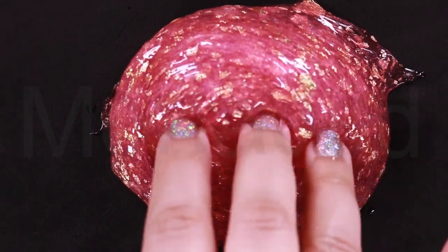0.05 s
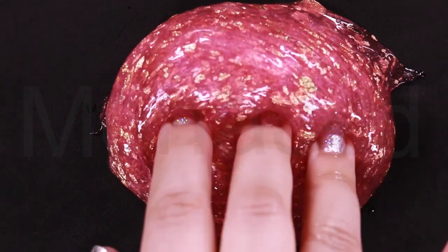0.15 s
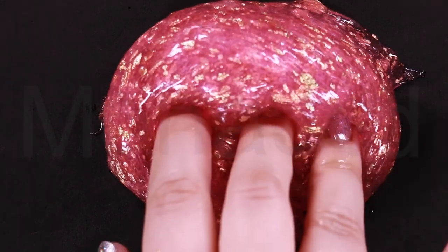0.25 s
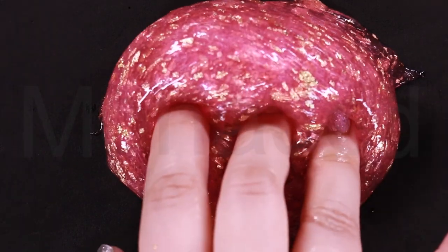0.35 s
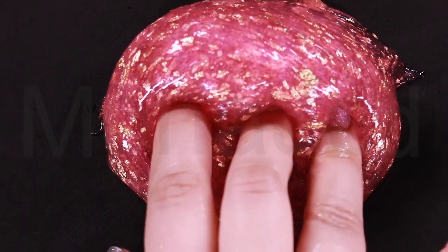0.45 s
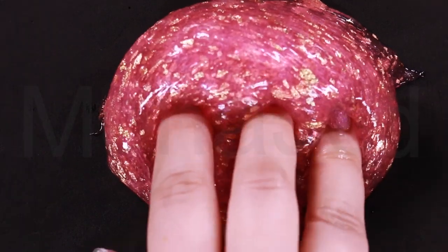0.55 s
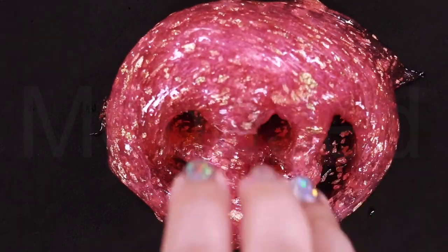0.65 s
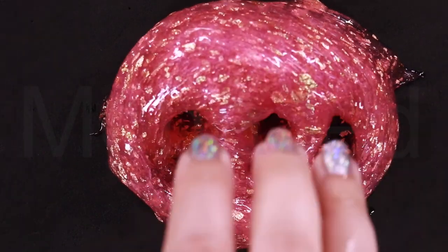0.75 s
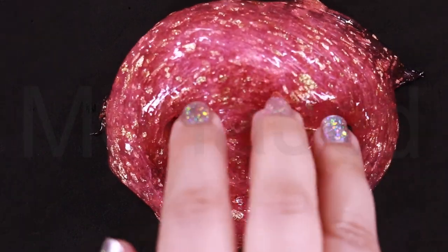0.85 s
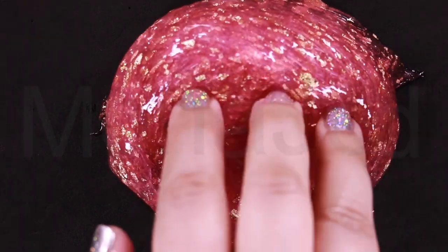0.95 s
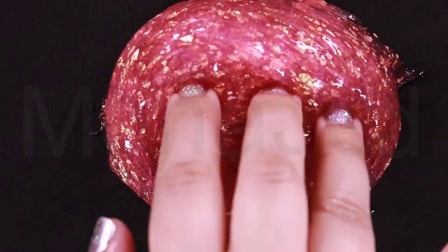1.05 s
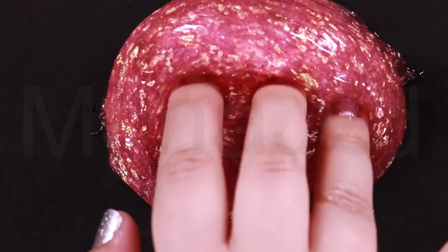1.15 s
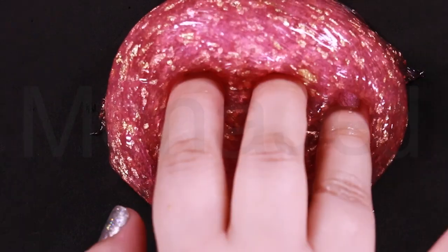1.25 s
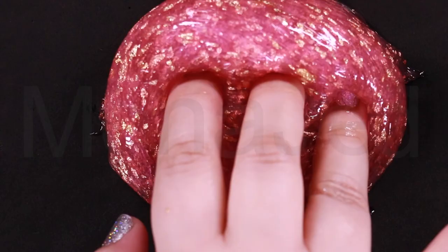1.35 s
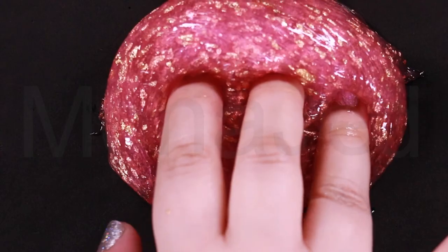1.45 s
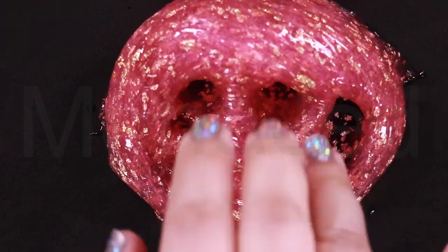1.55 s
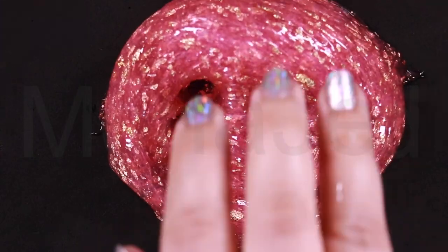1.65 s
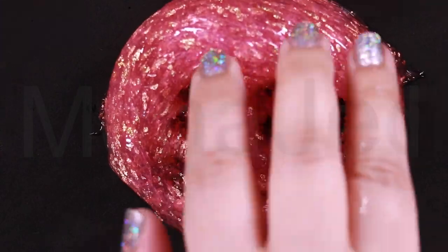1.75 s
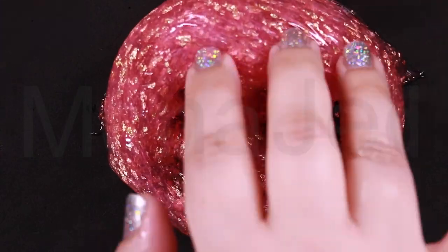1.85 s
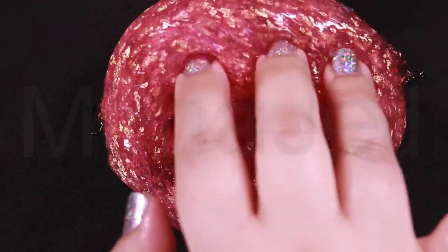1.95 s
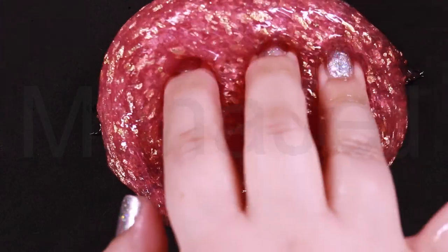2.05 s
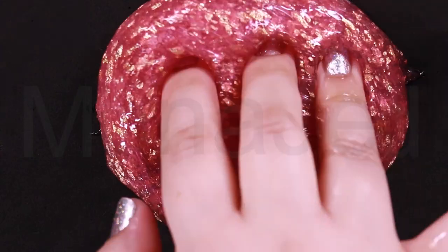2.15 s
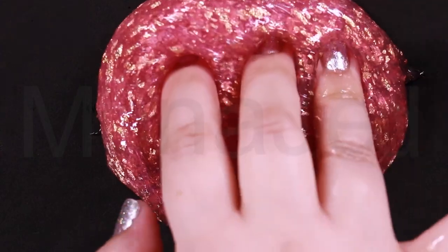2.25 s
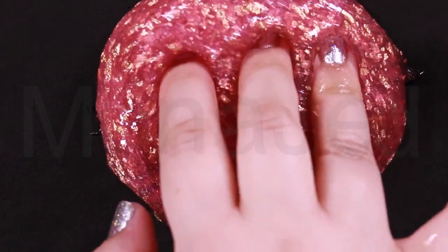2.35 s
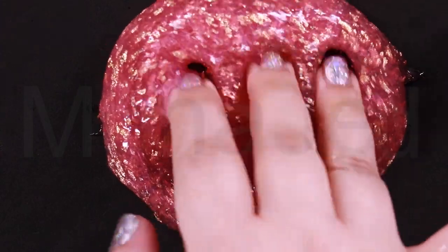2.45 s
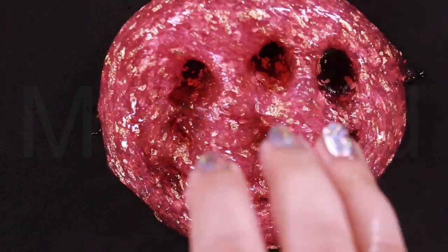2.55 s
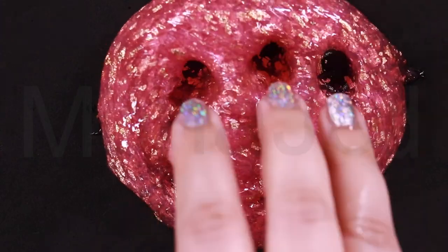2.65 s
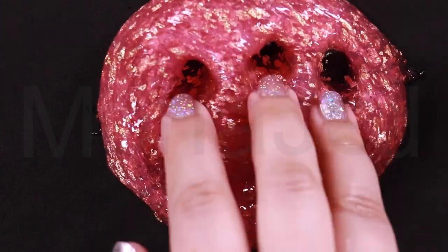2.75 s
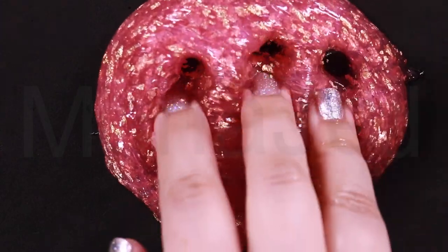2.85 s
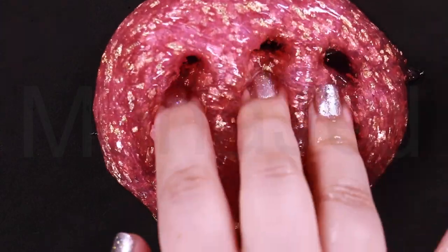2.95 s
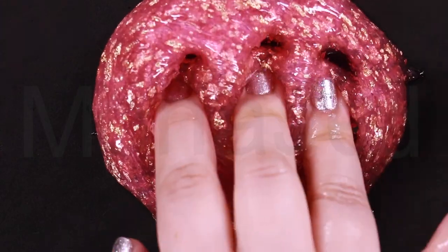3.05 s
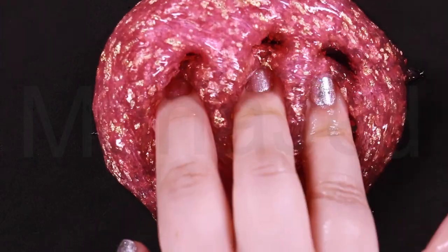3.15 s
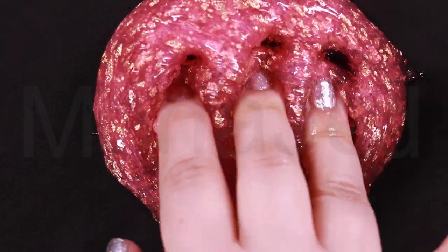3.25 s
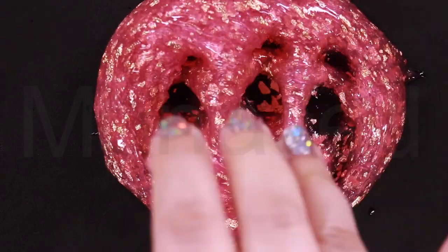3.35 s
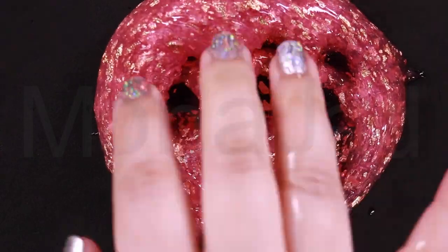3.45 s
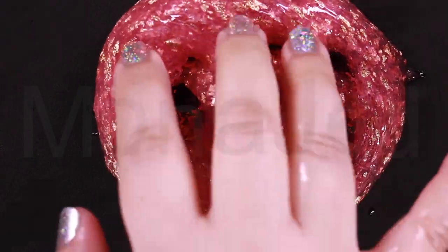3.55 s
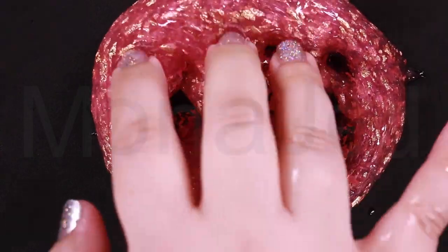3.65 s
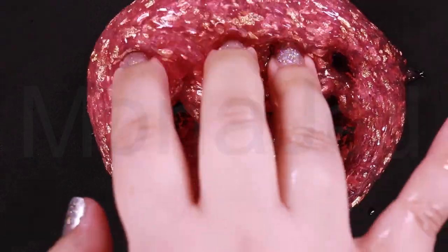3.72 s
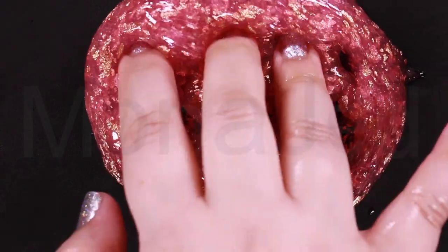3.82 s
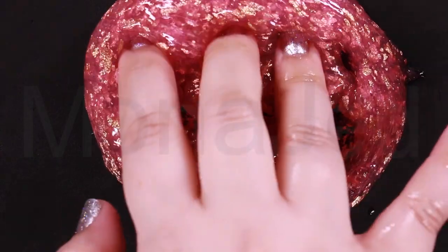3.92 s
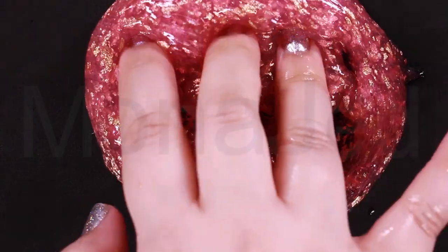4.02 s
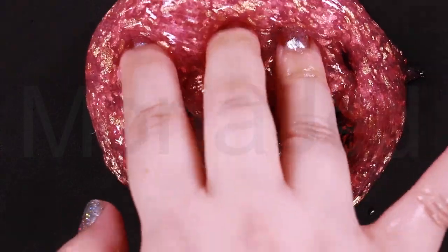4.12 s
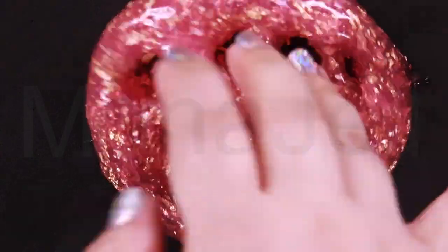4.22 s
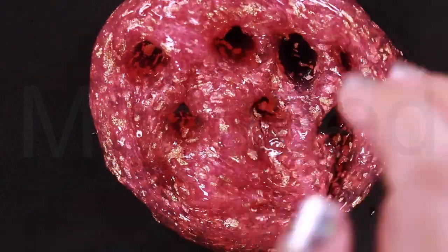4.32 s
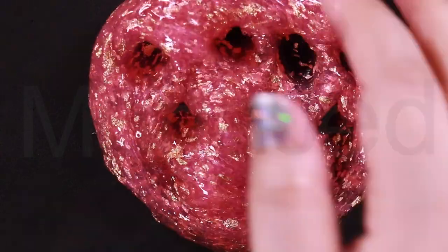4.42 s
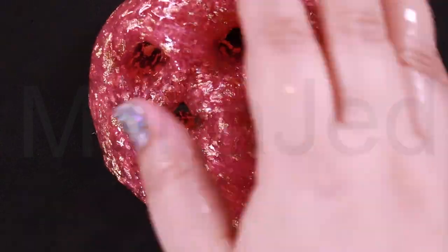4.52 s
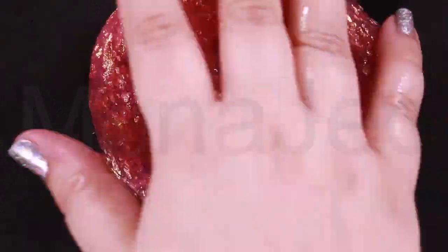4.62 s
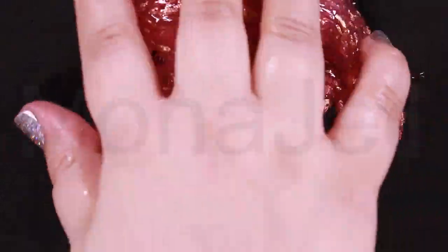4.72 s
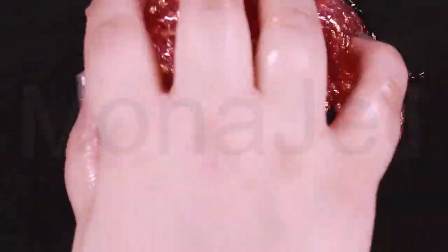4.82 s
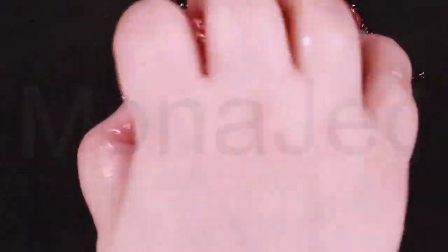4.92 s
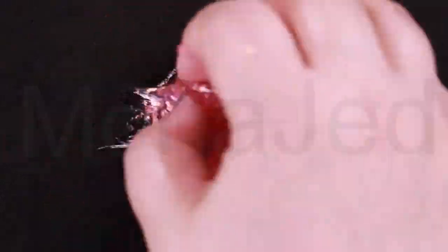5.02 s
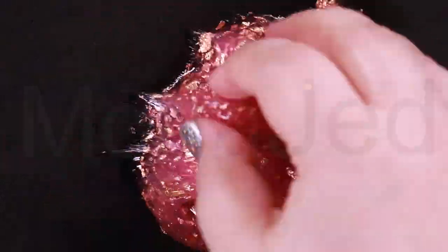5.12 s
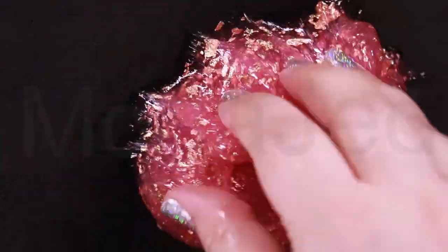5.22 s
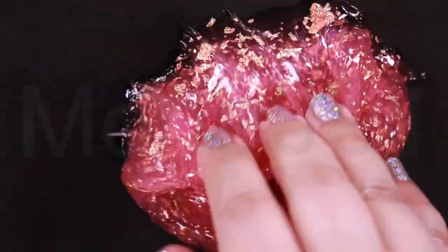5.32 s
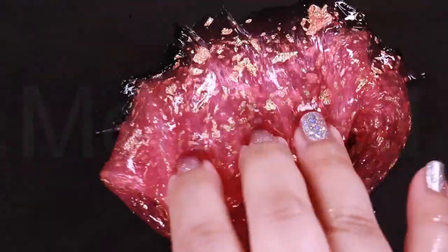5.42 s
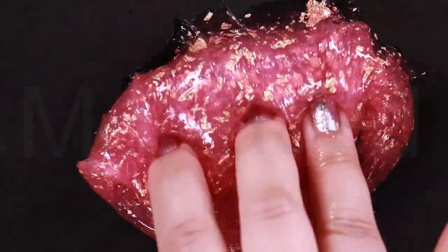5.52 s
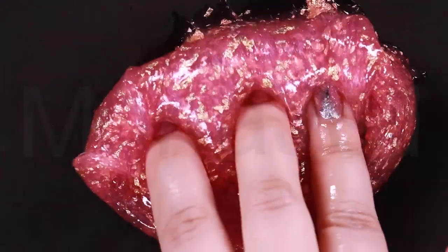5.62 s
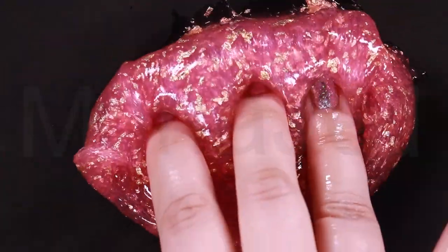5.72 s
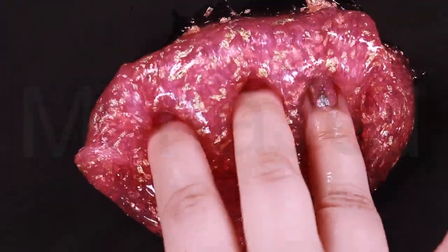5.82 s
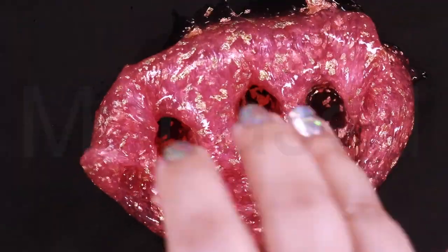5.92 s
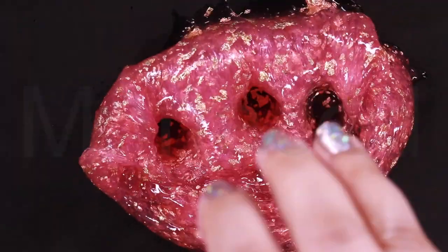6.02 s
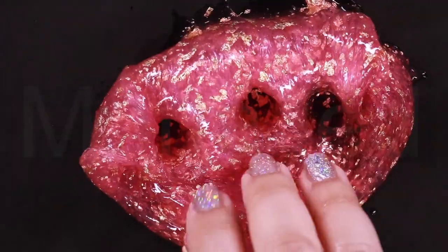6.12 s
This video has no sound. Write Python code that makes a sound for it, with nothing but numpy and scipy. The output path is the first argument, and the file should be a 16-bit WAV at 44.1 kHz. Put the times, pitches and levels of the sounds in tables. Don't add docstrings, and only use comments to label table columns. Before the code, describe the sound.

Close, dry-detailed slime handling in a small reverberant room. Bursts of sticky snapping and round, hollow pops break long quiet gaps, the loudest slightly overloaded. The first three bursts are strong; a thin wet squeak follows, then weaker pops and one hard smack. Squeezed air pockets squelch and fizz quietly with small hisses, before a final double pop. Soft table thuds ring beneath, with a very faint fan and far machine drone.

```python
import sys
import numpy as np
from scipy import signal
from scipy.fft import rfft, irfft, next_fast_len
from scipy.io import wavfile
from scipy.ndimage import uniform_filter1d, map_coordinates

SR = 44100
rng = np.random.default_rng(int(sys.argv[2]) if len(sys.argv) > 2 else 0)


def store_pcm(level_fs):
    pcm = np.round(np.clip(level_fs, -1, 1) * 32767).astype(np.int16)
    wavfile.write(sys.argv[1], SR, np.atleast_2d(pcm).T)


def magnitude_from_level(level_db):
    exponent = np.asarray(level_db, float) / 20
    return 10 ** exponent


N = 272097

# t/s, level/dB, brightness/dB, patch f/Hz, length/ms
RIPS = [(0.2843, -32, 8, 5970, 3.3), (0.668, -7.5, 11, 5400, 3), (0.6708, -10.5, -11, 4700, 3.5),
        (0.6851, -5.5, -6.5, 4210, 5), (1.5846, -14, 7.5, 6400, 2), (1.5868, -9.5, 4.5, 5000, 3),
        (1.5922, -7, -11.5, 4870, 2.5), (1.6002, -10.5, -3.5, 4850, 2), (1.6023, -6, -11, 3056, 3),
        (2.5045, -21.5, 5, 3000, 0.91), (2.541, -18.5, 7, 6000, 3), (2.5452, -10, -2, 3200, 3),
        (2.5488, -15.5, -8, 3936, 3.5), (3.358, -28.5, -1.5, 6000, 3), (3.3613, -24, -7.5, 3000, 4.5),
        (3.372, -31, 0, 5000, 6), (4.2752, -29, -1.5, 3200, 4), (4.294, -24, -11.5, 5000, 3),
        (4.301, -29, -10, 3484, 9), (4.3715, -5.5, -39.5, 2250, 2), (5.9381, -22.5, -5.5, 4010, 3.5),
        (5.9469, -15, -16, 4260, 1.5), (5.9495, -15.5, 4, 5530, 4.5)]
SNAP_T60_MS, SNAP_LOSS_DB, DULLING_DB, PATCH_SCATTER, PATCH_SINKS = 8, 2, 9, 0.05, 0.87
# t/s, level/dB, brightness/dB, patch f/Hz
TICKS = [(0.662, -28.5, -10, 4500), (0.695, -20.5, -17, 4800), (1.307, -66.5, 16.5, 2200),
         (1.45, -55, 18.5, 2180), (1.471, -60.5, 13, 2200), (1.5605, -33.5, -6, 1944),
         (1.5829, -11.5, 7.5, 5000), (2.5302, -17, 0, 4300), (2.5379, -28, 12, 5100),
         (3.183, -52, -12.5, 5000), (3.198, -39, -12, 4500), (3.2322, -38, -18, 5600),
         (3.2764, -29, -14, 4670), (3.3448, -21.5, -19.5, 4230), (3.3513, -37, 1, 5000),
         (3.381, -17.5, -16, 3950), (4.354, -36, -20, 1900), (4.3649, -29, -27, 1890),
         (4.783, -49.5, -18.5, 5600), (4.815, -32.5, -18, 2170), (4.8587, -37.5, -10, 5000),
         (4.993, -26.5, 7, 5900), (5.256, -45, -16, 4280), (5.224, -52, -19, 3300),
         (5.439, -47.5, -3, 2920), (5.501, -35, -15, 3090), (5.679, -54.5, 8, 1900),
         (5.9217, -32, 14.5, 6570)]
TICK_T60_MS, LINGER = 6.1, 1.2
# f/Hz, width/Hz, level/dB
FILM = [(1300, 530, -4.5), (3000, 760, -2), (5000, 2300, -12)]
FINE_FILM = [(8640, 4200, 0), (12400, 2400, 0.5)]

# t/s, level/dB, cavity f/Hz, t60/ms, wait for the gulp/ms
HOLES = [(0.6693, -11, 870, 14, 7.7), (0.6881, 1.5, 904, 19, 14.2), (1.589, -2, 1443, 6.3, 3.5),
         (1.603, -2, 864, 15, 10.6), (1.594, -5.5, 950, 12, 4), (2.5463, -2, 1074, 10.2, 5),
         (2.5515, -8.5, 1006, 33, 17), (3.3615, -13, 842, 14.4, 6.1), (4.2755, -17.5, 1175, 20, 6.9),
         (4.2929, -12.5, 1007, 18.4, 5.7), (4.3685, -14, 1502, 10, 2), (4.3712, -5, 1686, 6.7, 1.5),
         (4.3735, -9.5, 808, 18, 4.36), (5.9378, -12.5, 890, 21, 3.5), (5.9498, -4, 847, 27, 5.86)]
GULP_LOSS_DB, GULP_LATE_DB_PER_MS, GULP_PITCH = 2, 0.78, 0.87
# t/s, level/dB, cavity f/Hz
BLIPS = [(0.286, -41, 1390), (0.6622, -28.5, 682), (1.56, -37, 1300), (2.51, -35.5, 1492),
         (2.53, -24, 1075), (2.543, -23, 1402), (3.183, -40, 1110), (3.2, -37.5, 1316), (3.233, -36, 1104),
         (3.275, -33, 1096), (3.346, -28.5, 1610), (3.357, -31, 1160), (4.3075, -25, 1057),
         (4.3429, -25.5, 870), (4.3526, -39, 970), (4.816, -41, 1060), (4.9923, -28.5, 1257),
         (5.9468, -10.5, 930), (5.932, -31.5, 890), (5.984, -26, 950), (0.672, -9, 1375)]
BLIP_T60_MS = 22

# t/s, flap f/Hz, level/dB, roughness/1
SQUEAK = [
    (2.891, 448.6, -56, 0.13),
    (2.897, 438.2, -33, 0.41),
    (2.912, 481.7, -31, 0.36),
    (2.926, 555.3, -31.5, 0.29),
    (2.959, 554.7, -30.5, .25),
    (2.975, 451.5, -32, 0.5),
    (3.03, 443.7, -32, 0.5),
    (3.09, 430, -43, .9),
    (3.17, 433, -55, .9),
]
GASP_S, GASP_DB, GASP_RISE_S, GASP_FADE_DB_PER_S = 3.274, -32, 0.0069, 239
# f/Hz, width/Hz, level/dB
SLIT = [(524, 400, -5), (1120, 400, 2), (1600, 290, 0), (2250, 78, -1), (3170, 320, -0.5), (5100, 460, 3.5),
        (3950, 300, -5.5), (6000, 1100, -13.5)]

# t/s of the peak, bubbling level/dB, 10 dB fall/ms, fizz above it/dB, pocket f/Hz
SQUEEZES = [(4.84, -52.5, 55, -4.5, 1267), (4.933, -36.5, 28, -9.5, 1300), (4.954, -43.5, 11, -0.5, 1260),
            (5.075, -38, 32, -19, 1115), (5.129, -30, 31.5, -14.5, 977), (5.159, -37, 22.5, -5, 1025),
            (5.255, -45, 33, -13.5, 955), (5.402, -41.5, 41, -11, 1048), (5.498, -36.5, 23, -16.5, 1070),
            (5.519, -34.5, 24, -8, 1120), (5.547, -38, 24, -16.5, 1085), (5.595, -41.5, 12, -18, 975),
            (5.632, -45.5, 14, -11.5, 1100), (5.678, -46, 21, -20.5, 1076)]
# f/Hz, level/dB
FIZZ = [(800, -30.5), (1800, 1), (2700, -1.5), (4200, -7), (6000, -11.5), (7500, -24), (15600, -34.5)]
# t/s, level/dB, f/Hz, width/Hz, t60/s
LEAKS = [
    (0.288, -50, 5800, 1100, .4),
    (4.825, -47, 5000, 6000, .6),
    (4.996, -51.5, 11500, 7000, 0.38),
    (4.3, -42, 2450, 390, 0.25),
    (5.975, -33, 1850, 300, 0.31),
]

# t/s, level/dB, plate ring/dB, thud/dB
KNOCKS = [
    (0.668, -26.5, 14.5, -32),
    (0.688, -25.5, 12, -17.5),
    (1.595, -30, 9.5, -15),
    (1.602, -29.5, -11, -15.5),
    (2.546, -34, 13.5, -9.5),
    (3.363, -32, 8, -12),
    (4.291, -39, 6, -6.5),
    (4.37, -20.5, 3, -7),
    (5.937, -31, -4, -19),
    (5.95, -24.5, -7, -14.5),
]
# f/Hz, width/Hz, level/dB
TABLE = [(139, 28, -7), (211.9, 40, 0.5), (344, 60, -2.5)]
# f/Hz, level/dB, t60/s
PLATE = [(582.3, 0, 0.2), (829, -10, 0.2), (1058, -10.5, 0.092), (214.1, -17, 0.29)]

# f/Hz, t60/s
ROOM = [(100, 1), (260, 1), (700, 0.33), (1800, 0.37), (4800, 0.44), (12800, 0.28)]
# f/Hz, level/dB
WALLS = [(100, -5.5), (450, -7.5), (1000, -2.5), (2200, -4), (5000, -2.5), (7500, -2), (11500, -6),
         (15600, -12.5)]
# f/Hz, width/Hz, level/dB
HOLLOW = [(840, 25, -3), (1046, 16, -2.5)]

# t/s, length/s, f/Hz, width/Hz, level/dB
DRONES = [
    (0, 0.14, 2250, 50, -60),
    (1.198, 0.32, 2250, 110.8, -63.5),
    (1.97, 0.26, 477, 30.1, -52.5),
    (2.197, 0.39, 473, 60.5, -55),
    (2.602, 0.29, 417, 40, -60.5),
    (3.548, 0.52, 412, 30, -56),
]
# f/Hz, level/dB
AIR = [(30, -11), (60, -15), (140, -17), (380, -6), (900, -10), (2250, -19.5), (3280, -25), (15600, -35.5)]
APART = [(25, -6.5), (144, -7.5), (184, -7.5), (341, -3), (1120, -5), (1810, -5), (13700, -15),
         (15600, -17.5)]
# f/Hz, rms level/dB
HUM = [(118.4, -75), (236.9, -71.5), (290.7, -66), (409.1, -66.5)]


def tears():
    patch, thick, thin = np.zeros(N), np.zeros(N), np.zeros(N)
    t = np.arange(SR // 20) / SR
    crackle = snaps(spread_db=7.0)
    for s, db, bright_db, hz, t60 in snap_list():
        burst = decay(t, db, np.clip(t60, 2, 60) / 1000, rise_s=0.00056)
        add(thick, s, burst)
        burst = burst * crackle[round(s * SR):][:len(t)]
        burst[3] += magnitude_from_level(db + 12.0)
        narrow = resonance(burst, hz, width_hz=0.34 * hz)
        add(patch, s, resonance(narrow, hz, width_hz=1.0 * hz))
        add(thin, s, burst * magnitude_from_level(bright_db))
    thin = ringing(ringing(thin, FINE_FILM), [(10400, 13000, 0.0016)])
    thick = lowpass(ringing(thick * snaps(spread_db=1.5), FILM), hz=6840)
    return magnitude_from_level(10.5) * patch + magnitude_from_level(10.5) * thick + magnitude_from_level(0.5) * thin


def snap_list():
    luck = rng.standard_normal((len(RIPS), 3))
    trains = []
    for (s, db, bright, hz, ms), scatter in zip(RIPS, luck):
        for k in range(3):
            patch_hz = hz * PATCH_SINKS ** (k - 1) * np.exp(PATCH_SCATTER * scatter[k])
            trains.append((s + ms * k / 2000, db - SNAP_LOSS_DB * k, bright - DULLING_DB * k,
                           patch_hz, SNAP_T60_MS + LINGER * ms))
    return trains + [(*tick, TICK_T60_MS) for tick in TICKS]


def pops():
    out, t = np.zeros(N), np.arange(SR // 10) / SR
    rows = pop_list()
    for (s, db, hz, t60), (start, waver) in zip(rows, rng.random((len(rows), 2))):
        sagging = 2 * np.pi * (hz * t * (1 - 6 * t) + start)
        phase = sagging + 1.05 * np.sin(2 * np.pi * (170 * t + waver))
        shape = decay(t, db + 4.5, np.clip(t60, 4, 120) / 1000, rise_s=0.00038)
        add(out, s, shape * (np.sin(phase) + 0.28 * np.sin(2 * phase)))
    return highpass(lowpass(out, hz=4500), hz=350)


def pop_list():
    gulps = []
    for s, db, hz, t60, ms in HOLES:
        gulp_db = db - GULP_LOSS_DB - GULP_LATE_DB_PER_MS * ms
        gulps.append((s + ms / 1000, gulp_db, hz * GULP_PITCH, t60))
    return [hole[:4] for hole in HOLES] + gulps + [(*blip, BLIP_T60_MS) for blip in BLIPS]


def squeak():
    before = (SQUEAK[0][0] - 0.002, 440, -100, 0.4)
    after = (SQUEAK[-1][0] + 0.1, 430, -100, 0.9)
    hz, db, rough = curves([before, *SQUEAK, after])
    rough = np.clip(rough, 0, 1)
    late = np.arange(N) / SR - GASP_S
    gasp_drop = np.where(late > 0, GASP_FADE_DB_PER_S * late, -25 * late / GASP_RISE_S)
    db = np.maximum(db, GASP_DB - gasp_drop)
    cycle = np.cumsum(hz * (1 + (0.004 + 0.12 * rough) * wobble(400))) / SR
    closures = np.diff(np.floor(cycle), prepend=0)
    flaps = lowpass(closures * magnitude_from_level(1.4 * wobble(270)), hz=4360)
    puffs = rng.standard_normal(N) * (1 + 0.43 * np.cos(2 * np.pi * cycle))
    voiced = unit(ringing(flaps, SLIT))
    breathy = unit(lowpass(ringing(puffs, SLIT), hz=7690))
    source = (1 - rough) * voiced + rough * breathy
    return magnitude_from_level(db) * (source + magnitude_from_level(-17) * lowpass(puffs, hz=11640))


def squelch():
    bubble_db, fizz_db, centre_hz = fold()
    when, pitch, size = rng.random(2600), rng.standard_normal(2600), rng.exponential(size=2600)
    start = ((4.7 + 1.2 * when) * SR).astype(int)
    t = np.arange(300) / SR
    hz = (centre_hz[start] * np.exp(0.2 * pitch))[:, None]
    life = t * hz / 1.6
    strength = magnitude_from_level(2.56 * np.minimum(size, 3.5))[:, None]
    blips = strength * life * np.exp(-life) * np.sin(2 * np.pi * hz * t)
    places = start[:, None] + np.arange(300)
    bubbles = np.bincount(places.ravel(), blips.ravel(), N)
    bubbles = bubbles / np.std(bubbles[start])
    clumps = magnitude_from_level(2.3 * wobble(200))
    fizz = unit(clumps * hiss(FIZZ))
    return magnitude_from_level(bubble_db + 1.5) * (bubbles + magnitude_from_level(fizz_db + 3.5) * fizz)


def fold():
    s, db, ms, fizz_db, hz = np.transpose(SQUEEZES)[..., None]
    swell = magnitude_from_level(db - 1e4 * np.abs(np.arange(N) / SR - s) / ms) ** 2 + 1e-30
    total = swell.sum(0)
    return 10 * np.log10(total), (swell * fizz_db).sum(0) / total, (swell * hz).sum(0) / total


def leaks():
    out, t = np.zeros(N), np.arange(SR // 6) / SR
    for s, db, hz, width_hz, t60 in LEAKS:
        band = resonance(rng.standard_normal(len(t)), hz, width_hz)
        jet = unit(resonance(band, hz, width_hz))
        add(out, s, decay(t, db, t60, rise_s=0.006) * jet)
    return out


def knocks():
    top, out, t = np.zeros(N), np.zeros(N), np.arange(SR // 3) / SR
    sinking = np.sin(2 * np.pi * np.cumsum(78 + 140 * np.exp(-t / 0.035)) / SR)
    plate = sum(magnitude_from_level(db - 60 * t / t60) * np.sin(2 * np.pi * hz * t) for hz, db, t60 in PLATE)
    plate = plate * (1 - np.exp(-t / 0.0053))
    plate = plate * (0.93 + 0.67 * np.exp(-t / 0.021))
    uneven = magnitude_from_level(4 * wobble(36)) * np.tanh(3 * wobble(48))
    for s, db, plate_db, thud_db in KNOCKS:
        add(top, s, magnitude_from_level(db + 16.0) * np.hanning(60))
        add(out, s, magnitude_from_level(db + plate_db - 1.5) * plate)
        broken = sinking * np.resize(uneven[round(s * SR):], len(t))
        add(out, s, decay(t, db + thud_db + 1, 0.36, rise_s=0.022) * broken)
    return ringing(top, TABLE) + out


def room(x):
    frames = dict(nperseg=512, noverlap=384)
    hz, t, z = signal.stft(x, SR, **frames)
    power = np.abs(z) ** 2
    scattered = np.abs(uniform_filter1d(power, size=13, axis=0))
    power = np.where(hz[:, None] > 1400, scattered, power)
    keep = magnitude_from_level(-120 * t[1] / along(ROOM, hz))
    arrival = [0.024, 0.056, 0.46, 0.5]
    stored = np.array([signal.lfilter(arrival, [1, -k], p) for k, p in zip(keep, power)])
    banding = 2.6 * rng.standard_normal(len(hz))
    banding = banding - uniform_filter1d(banding, size=7)
    noise = signal.stft(rng.standard_normal(N), SR, **frames)[2]
    gain = 7 * magnitude_from_level(along(WALLS, hz) + banding)[:, None]
    out = signal.istft(gain * np.sqrt(stored) * noise, SR, **frames)[1][:N]
    return out + ringing(out, HOLLOW)


def drones():
    out = np.zeros(N)
    for s, length, hz, width_hz, db in DRONES:
        band = resonance(rng.standard_normal(round(length * SR)), hz, width_hz)
        swell = np.hanning(len(band)) ** 0.5
        add(out, s, magnitude_from_level(db) * unit(resonance(band, hz, width_hz)) * swell)
    return out


def background():
    t = np.arange(N) / SR
    hum = sum(magnitude_from_level(db + 3.5 + 1.5 * wobble(2)) * np.sin(2 * np.pi * hz * t + 2.6 * wobble(6)) for hz, db in HUM)
    return magnitude_from_level(-53 + 0.36 * wobble(2.4) + 0.97 * wobble(10)) * hiss(AIR) + hum


def along(points, hz):
    f, v = np.transpose(points)
    return np.interp(np.log(hz + 1), np.log(f + 1), v)


def curves(rows):
    s, *cols = np.transpose(rows)
    return [np.interp(np.arange(N) / SR, s, c) for c in cols]


def unit(x):
    return x / np.sqrt(np.mean(x ** 2) + 1e-20)


def decay(t, db, t60, rise_s):
    return magnitude_from_level(db - 60 * t / t60) * (1 - np.exp(-t / rise_s))


def wobble(rate):
    knots = rng.standard_normal(int(N * rate / SR) + 4)
    return map_coordinates(knots, [np.arange(N) * rate / SR])


def filtered(x, response):
    m = next_fast_len(len(x) + SR // 2)
    return irfft(rfft(x, m) * response(np.fft.rfftfreq(m, 1 / SR)), m)[:len(x)]


def ringing(x, modes):
    def response(f):
        return sum((-1) ** k * magnitude_from_level(db) * 1j * f * w / (c * c - f * f + 1j * f * w)
                   for k, (c, w, db) in enumerate(modes))
    return filtered(x, response)


def resonance(x, hz, width_hz):
    return signal.lfilter(*signal.iirpeak(hz, hz / width_hz, SR), x)


def lowpass(x, hz):
    return signal.sosfilt(signal.butter(4, hz, fs=SR, output="sos"), x)


def highpass(x, hz):
    return signal.sosfilt(signal.butter(2, hz, "high", fs=SR, output="sos"), x)


def hiss(spectrum):
    return unit(filtered(rng.standard_normal(N), lambda hz: magnitude_from_level(along(spectrum, hz))))


def snaps(spread_db):
    return unit(rng.standard_normal(N) * magnitude_from_level(spread_db * rng.standard_normal(N)))


def add(out, s, wave):
    part = out[round(s * SR):][:len(wave)]
    part += wave[:len(part)]


def scene():
    snappy = tears() + pops()
    soft = highpass(squeak() + squelch(), hz=380)
    reverberant = magnitude_from_level(-8.5) * room(snappy + magnitude_from_level(-3.5) * soft)
    mid = snappy + soft + reverberant + knocks() + background() + drones() + leaks()
    return np.array([mid, mid])


def low_pass(x):
    return signal.sosfilt(signal.butter(12, 15780, fs=SR, output="sos"), x)


def record(dry):
    side = magnitude_from_level(-65.5) * hiss(APART)
    x = dry / (1 + np.abs(dry) ** 16) ** (1 / 16)
    x = highpass(x, hz=40)
    return low_pass(x + [side, -side])


dry = scene()
out = record(dry)
store_pcm(out)
```